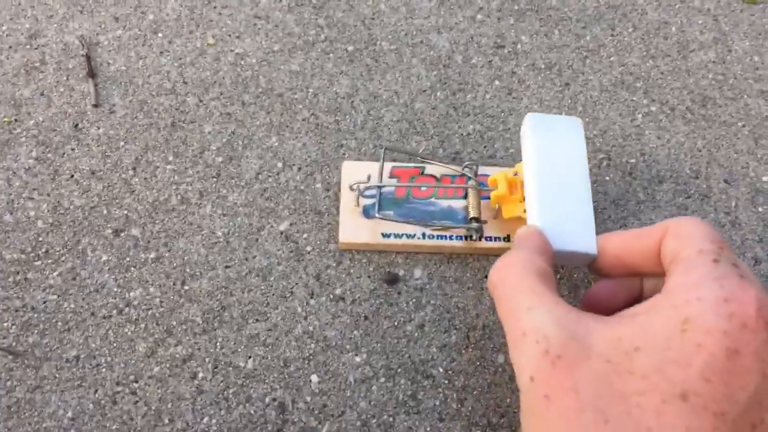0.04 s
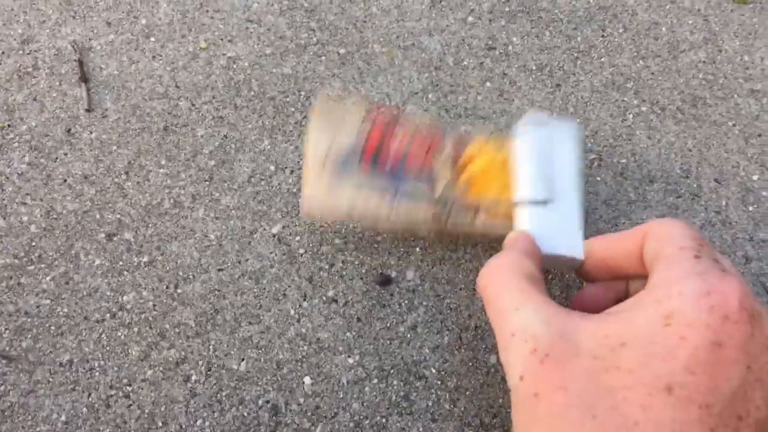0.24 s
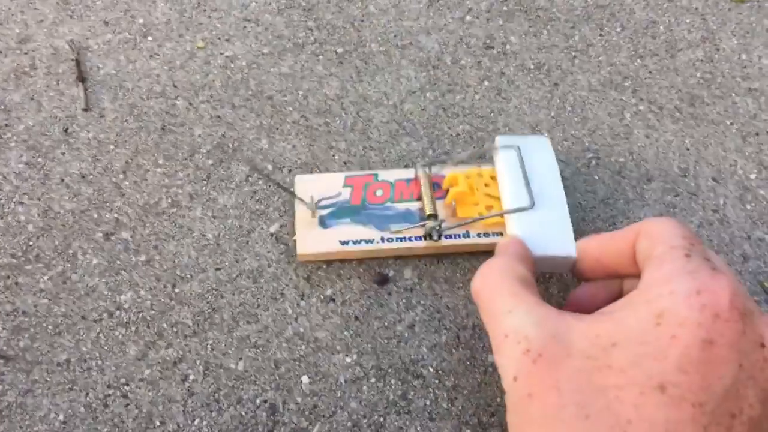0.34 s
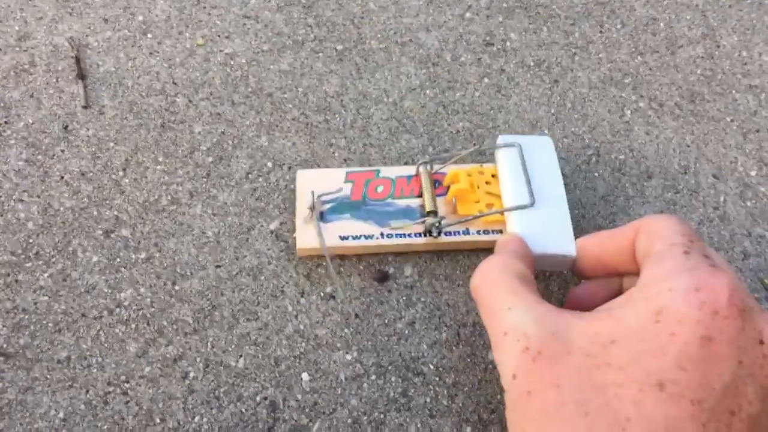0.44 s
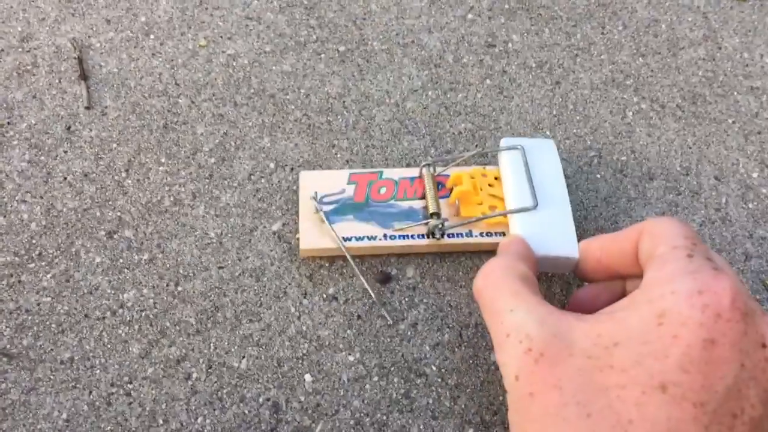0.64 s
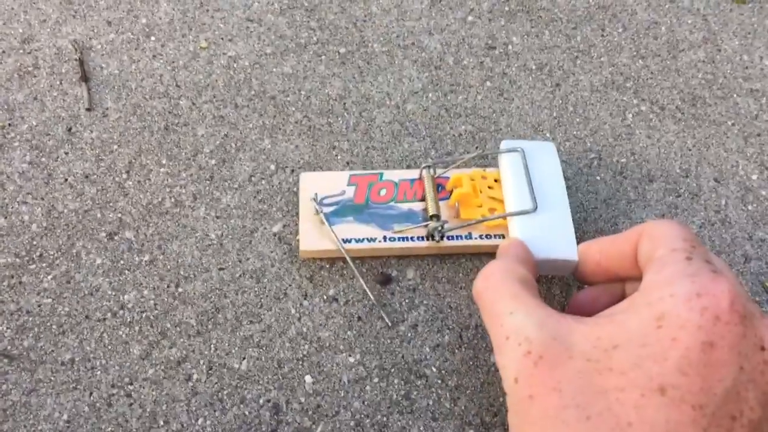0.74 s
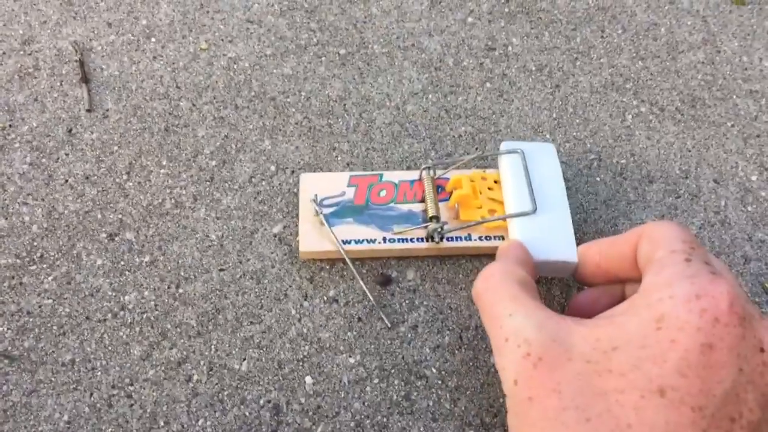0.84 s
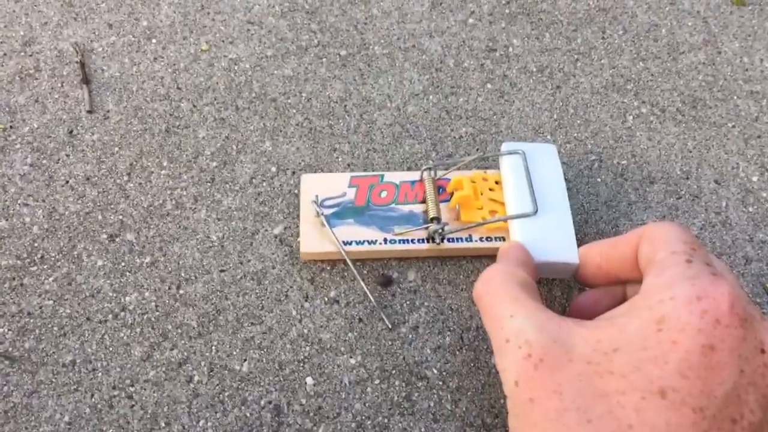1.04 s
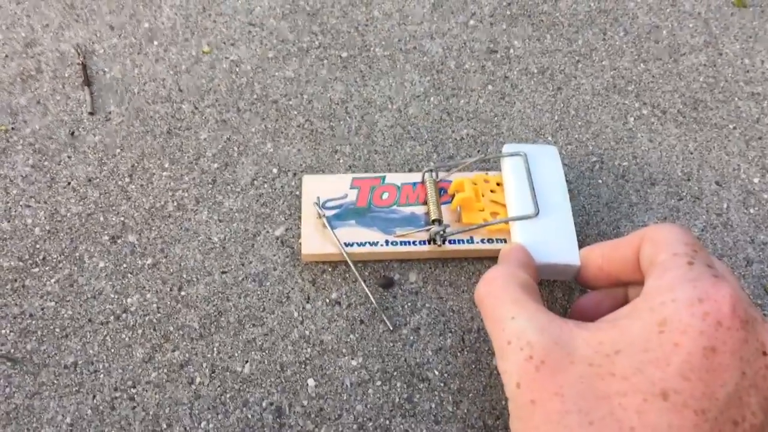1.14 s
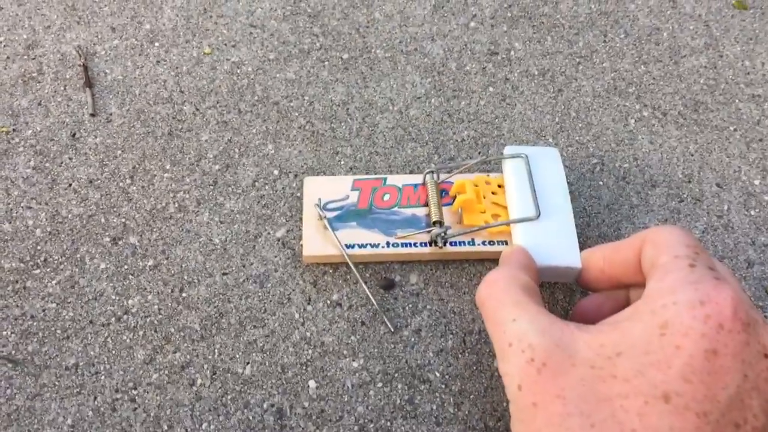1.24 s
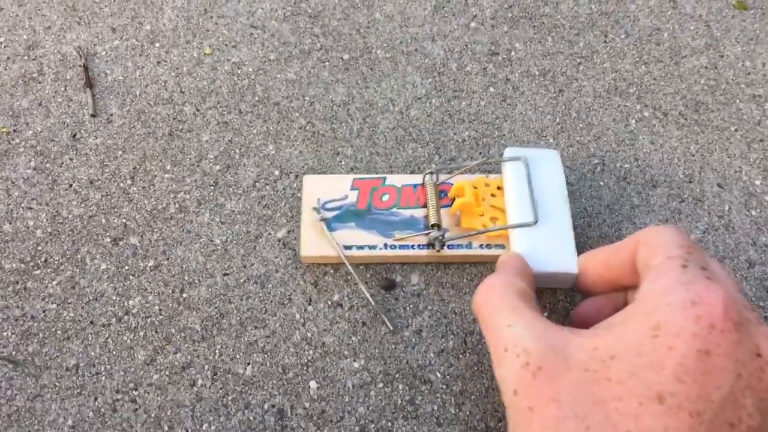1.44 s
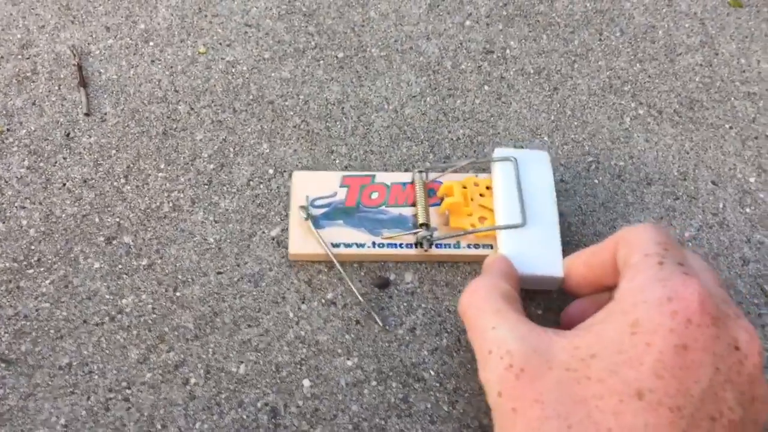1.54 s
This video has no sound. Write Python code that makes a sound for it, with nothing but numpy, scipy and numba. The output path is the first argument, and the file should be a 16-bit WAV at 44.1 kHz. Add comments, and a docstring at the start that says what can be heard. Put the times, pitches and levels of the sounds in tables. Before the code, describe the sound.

A mousetrap snaps shut with a sharp crack, then rattles briefly on pavement.

```python
"""A mousetrap snaps outdoors

A wooden mousetrap snaps on a hand-held plastic block, overloading the microphone and puffing air at it.
The trap jumps, its wires chatter, and it lands on rough pavement and settles. Behind it are distant
traffic, insect hiss and one faint chirp. A gain control turns everything down briefly after the blow."""
import sys
import numpy as np
from scipy import signal
from scipy.fft import rfft, irfft
from scipy.io import wavfile
from scipy.ndimage import minimum_filter1d
from numba import njit

SR = 44100
rng = np.random.default_rng(int(sys.argv[2]) if len(sys.argv) > 2 else 0)


def to_wav(s):
    """Save 16-bit WAV."""
    ch = np.atleast_2d(s).T  # columns
    pcm = np.round(np.clip(ch, -1, 1) * 32767)  # PCM
    wavfile.write(sys.argv[1], SR, pcm.astype(np.int16))


N = 70560
T = np.arange(N) / SR

# The bar's blow, its rebounds, and a short woody knock as the trap first strikes. Each row: start in seconds,
# level in dB, treble boost in dB, # hold in seconds, fade time in seconds. A fade time (t60) is how long a
# sound takes to drop 60 dB.
BLOWS_AND_KNOCK = [(0.2388, 8.5, -1, 0.0048, 0.035), (0.2526, -12, -6, .002, 0.015),
                   (0.2561, -10.5, 11.5, 0.0011, .015), (0.2605, -10, 7.5, .002, 0.015),
                   (0.2753, -5.5, -9, 0.00082, 0.0037)]
# Wires hitting the base and pavement. Each row: start in seconds, wire level in dB,
# strongest pitch in Hz, tick level in dB, wood level in dB.
WIRE_HITS = [(0.2171, -41, 7400, -44, -39.5), (0.232, -35, 7350, -41, -36), (0.2744, -2, 8600, -3, -18),
             (0.2786, -23, 8300, -2.5, -42), (0.282, -11, 8140, -8.5, -21), (0.287, -22, 8700, -17, -42),
             (0.2889, -8, 8500, -15, -34), (0.291, -13, 8650, -8, -34), (0.2961, -10, 8400, -9, -37),
             (0.3013, -14, 8500, -10, -42), (0.3066, -10.5, 8700, -9.5, -30),
             (0.3097, -16, 5740, -25, -25.5), (0.3121, -14.5, 5600, -16, -27), (0.317, -19, 6670, -12, -45),
             (0.3193, -15, 6700, -22, -39), (0.3222, -14, 6400, -27, -47), (0.327, -16, 6200, -16, -43),
             (0.332, -20, 7400, -22, -42), (0.337, -29, 8000, -21, -32), (0.339, -21.5, 7800, -33, -43),
             (0.3493, -27, 6100, -39, -36), (0.3835, -17, 6770, -25, -22), (0.3874, -15, 9000, -15.5, -28),
             (0.3894, -7.5, 8750, -27, -16), (0.3918, -5.5, 8900, -35, -20), (0.3971, -13, 8700, -18, -35),
             (0.4008, -6, 8960, -29, -25.5), (0.4062, -12, 8900, -28, -24), (0.4114, -15, 8550, -33, -32),
             (0.4133, -24, 7800, -26, -34.5), (0.4237, -10, 8800, -18, -33), (0.4378, -25, 6700, -30, -45),
             (0.4476, -25, 6300, -24, -25), (0.452, -16.5, 6730, -30, -29.5),
             (0.4642, -17, 8850, -29, -28.5), (0.47, -19.5, 8740, -26, -35),
             (0.4786, -15.5, 8650, -36, -35), (0.481, -17.5, 8700, -27, -28.5),
             (0.4832, -17, 8700, -38, -28), (0.497, -24.5, 6550, -44, -29), (0.5128, -26, 8850, -41, -39),
             (0.523, -33, 6860, -47, -40.5), (0.5405, -31.5, 8900, -47, -52),
             (0.5671, -10.5, 8660, -35, -20), (0.5725, -20, 8500, -29, -32), (0.5758, -9.5, 6500, -20, -29),
             (0.5791, -10.5, 8950, -26, -19), (0.5874, -17, 8700, -31, -33), (0.591, -25, 8700, -37, -26.5),
             (0.6106, -34, 7850, -49, -35), (0.6154, -47, 6550, -51, -37), (0.62, -26.5, 8400, -46, -32),
             (0.6249, -34, 8600, -49, -43), (0.6297, -22, 6540, -37, -34), (0.7025, -37, 6740, -53, -49.5),
             (0.726, -33.5, 6270, -48, -41), (0.7562, -42, 6700, -59, -50), (1.5376, -55, 6520, -82, -54.5)]
# The base landing on its edge. Each row: start in seconds, level in dB.
BASE_LANDINGS = [(0.3795, -1)]

# Broad resonances that shape a crack. Each row: pitch in Hz, width in Hz, relative level in dB.
TRAP_PEAKS = [(480, 480, -14.5), (1020, 300, -16), (2160, 200, -10), (2480, 250, -14), (3340, 254, -4),
              (3776, 350, -3.5), (5110, 250, -11), (6100, 300, -5.5), (7317, 320, -3), (8700, 220, -3.5),
              (9980, 600, -10), (11380, 470, -5.5), (12600, 440, -12), (13860, 570, -18)]  # the whole trap under the blow
EDGE_PEAKS = [(250, 300, -28), (890, 420, -16), (3250, 320, 4.5), (4100, 370, -9), (6580, 210, 1.5),
              (7260, 400, -7), (7800, 640, -4), (11660, 430, -8.5)]  # the base as it lands

# Modes, the tones a struck part rings with.
# Each row: pitch in Hz, relative level in dB, fade time in seconds.
BASE_BLOW_MODES = [(3366, 0, .022), (3650, -6, .02)]  # the base under the blow
BASE_EDGE_MODES = [(190, -29, .035), (1350, -20, .045), (2880, -10, .016), (3170, -2, .016), (3320, 2, .02),
                   (3680, -5, .018)]  # the base struck on its edge
BASE_TAP_MODES = [(1416, -21, 0.078), (2304, -14.5, 0.017), (2900, -7.5, 0.02), (3507, 1.5, 0.031),
                  (3900, -5, 0.0301), (4260, -4, .025)]  # the base tapped by a wire
WIRE_MODES = [(5215, -8.5, 0.048), (6030, -8, 0.069), (6450, 3, .05), (6930, -6, .075), (7465, -6.5, .055),
              (7850, -6, .07), (8870, -6, .055), (8920, -2, .035), (8940, -4, .03)]  # the steel wires
SPRING_MODES = [(6016, -25, .14), (6904, -20, .2), (7320, -24, .15), (7962, -26, .35), (8580, -16, .17),
                (8701, -12, .18), (11291, -21, .13), (11433, -21, .12), (11565, -17, .13),
                (11779, -20, .13), (11843, -18, .13), (12912, -20, .26), (13458, -26, .3),
                (14845, -28, .28)]  # the spring's fine ring
FRAME_MODES = [(1412, -22, .19), (1750, -26, .13), (3510, -28, .11), (4258, -27, .22)]  # the wire frame's slow, low ring

# Noise colours, from bass to treble. Each row: frequency in Hz, relative level in dB.
SCRAPE_COLOUR = [(1200, -37.5), (2000, -26), (4600, -14.5), (6200, 5), (9200, 3.5), (10300, -21),
                 (16000, -21)]  # scraping steel
TICK_COLOUR = [(6000, -27.5), (9500, -9.5), (10700, -10), (11700, 4), (12600, -4.5), (14000, -6.5),
               (15400, -6.5), (16500, -13)]  # a sharp tick
KNOCK_COLOUR = [(150, -18.5), (500, -21), (1100, -21.5), (2000, -12.5), (2600, -8), (3300, -2), (4300, 2),
                (6000, -13.5)]  # a knock on wood
TRAFFIC_COLOUR = [(15, -47.5), (25, -24.5), (41, -13.5), (64, -0.5), (153, -3), (249, -10.5), (354, -26.5),
                  (624, -32.5), (754, -33.5), (1230, -28.5), (1650, -32), (3080, -41), (3520, -40),
                  (5000, -37.5), (6740, -22.5), (8590, -48.5), (16000, -72.5)]  # distant traffic and outdoor air

SCRAPE_T60_S, CONTACT_HOLD_S = .0072, .00073
LONG_RING = 22000  # samples, about half a second


def snap():
    """The bar whips round, slams on the block so that the whole trap rings, and rebounds; then a short woody
    knock sounds as the trap first strikes."""
    blow_s, rise_s = BLOWS_AND_KNOCK[0][0], .0021
    swish = noise(lambda f: slopes(TICK_COLOUR)(f) + humps(TRAP_PEAKS)(f) / 2, N)
    out = undb(-7.5) * swish * np.exp(-np.abs(T - blow_s) / rise_s) * (T < blow_s)
    add(out, blow_s, struck(ring(BASE_BLOW_MODES), db=6))
    add(out, blow_s, spring_and_frame(spring_db=-6, frame_db=-2))
    for start, db, treble_db, hold, t60 in BLOWS_AND_KNOCK:
        treble = lambda f: undb(treble_db * np.clip(np.log2(f / 3500) / 2, 0, 1))
        crack = burst(lambda f: humps(TRAP_PEAKS)(f) * treble(f), t60, hold)
        add(out, start, struck(crack, db))
    return out


def spring_and_frame(spring_db, frame_db):
    """The spring and the wire frame ring on after a hit."""
    spring = undb(spring_db) * ring(SPRING_MODES, size=LONG_RING)
    return spring + undb(frame_db) * ring(FRAME_MODES, size=LONG_RING)


def air_puff():
    """The jumping trap pushes air at the microphone: a thump that sinks in pitch."""
    start_s, rise_s, decay_s = .2413, .0034, .011
    start_hz, end_hz, sink_s = 164, 42, .007
    t = np.maximum(T - start_s, 0)
    hz = end_hz + (start_hz - end_hz) * np.exp(-t / sink_s)
    envelope = np.minimum(t / rise_s, 1) * np.exp(-t / decay_s)
    return -undb(11.5) * np.sin(2 * np.pi * np.cumsum(hz) / SR) * envelope


def landing():
    """The base knocks on the pavement: a woody ring under a gritty crack."""
    out = np.zeros(N)
    for start, db in BASE_LANDINGS:
        crack = burst(humps(EDGE_PEAKS), t60=.018, hold=.0012)
        add(out, start, struck(ring(BASE_EDGE_MODES), db) + struck(crack, db + 1))
    return out


def wire_chatter():
    """Each hit rings the wires, knocks the wood, ticks and keeps the spring's coils shimmering."""
    focus_db, focus_width_hz = 13.5, 430
    coil_db, coil_t60_s = -29, .135
    out = np.zeros(N)
    for start, wire_db, ring_hz, tick_db, wood_db in WIRE_HITS:
        focus = lambda f: undb(focus_db * np.exp(-((f - ring_hz) / focus_width_hz) ** 2))
        steel = lambda f: slopes(SCRAPE_COLOUR)(f) * focus(f)
        wire = burst(steel, SCRAPE_T60_S, CONTACT_HOLD_S)
        # Where a wire is touched shifts its pitch a little.
        wire += struck(ring(WIRE_MODES, focus, detune=.004), -9) / 2
        wood = burst(slopes(KNOCK_COLOUR), t60=.008, hold=CONTACT_HOLD_S)
        wood += struck(ring(BASE_TAP_MODES), 3.5) / 2
        tick = burst(slopes(TICK_COLOUR), t60=.014, hold=CONTACT_HOLD_S)
        add(out, start, struck(wire, wire_db) + struck(wood, wood_db) + struck(tick, tick_db))
        shimmer = undb(wire_db) * burst(steel, coil_t60_s)
        shimmer += undb(tick_db) * burst(slopes(TICK_COLOUR), coil_t60_s)
        add(out, start, undb(coil_db) * shimmer)
        rebound_s = start + .0035 * (.5 + rng.random())  # the wire touches again, more softly
        add(out, rebound_s, struck(burst(steel, SCRAPE_T60_S), wire_db - 12.5))
        add(out, start, spring_and_frame(spring_db=(wire_db + tick_db) / 2 - 8, frame_db=wood_db))
    return out


def grit_slide():
    """A wire drags over grit as the trap settles; tiny catches ring the wire and the wood."""
    peak_s, spread_s, catches_per_s = .605, .05, 400
    catches = (rng.random(N) < catches_per_s / SR) * rng.standard_normal(N)
    one_catch = unit(burst(slopes(SCRAPE_COLOUR), SCRAPE_T60_S)) + unit(ring(BASE_TAP_MODES)) / 2
    scrape = unit(signal.fftconvolve(catches, one_catch)[:N])
    return undb(-34.5) * scrape * np.exp(-((T - peak_s) / spread_s) ** 2)


def echo(x):
    """The ground and distant walls scatter a little of the sound back."""
    colour = slopes([(100, -13.5), (1000, -2), (4000, -1.5), (15000, -11)])
    tail = burst(colour, t60=.35, size=LONG_RING)
    return undb(-28) * signal.fftconvolve(x, tail / np.linalg.norm(tail))[:N]


def traffic_and_insects():
    """Distant traffic rumbles under a high, fluttering band of insect hiss."""
    insect_hz, flutter_db = 6840, 2.5
    flutter = noise(lambda f: 1 / (1 + (f / 25) ** 4), N)
    insects = noise(lambda f: humps([(insect_hz, 640, 0)])(f) ** 2, N)
    traffic = noise(slopes(TRAFFIC_COLOUR), N)
    return undb(-44) * traffic + undb(-58 + flutter_db * flutter) * insects


def bird():
    """One distant falling whistle, blurred as if by echoes."""
    peak_s, spread_s, pitch_hz, fall_hz_per_s = 1.315, .053, 3560, 2000
    t = T - peak_s
    blur = noise(lambda f: 1 / (1 + (f / 90) ** 2), N)
    whistle = np.sin(2 * np.pi * (pitch_hz - fall_hz_per_s * t / 2) * t)
    return undb(-58.5) * blur * whistle * np.exp(-np.abs(t) / spread_s)


def undb(db):
    """Turn decibels into a gain."""
    return 10 ** (np.asarray(db) / 20)


def unit(x):
    """Scale to an average (rms) level of 1."""
    return x / np.sqrt(np.mean(x ** 2))


def noise(colour, size):
    """Noise of level 1, shaped by colour, a function from Hz to gain."""
    hz = np.fft.rfftfreq(size, 1 / SR) + 1
    return unit(irfft(rfft(rng.standard_normal(size)) * colour(hz), size))


def slopes(points):
    """A colour that joins (Hz, dB) points."""
    hz, db = np.array(points).T
    return lambda f: undb(np.interp(np.log(f), np.log(hz), db))


def humps(peaks):
    """A colour made of broad resonances."""
    return lambda f: np.sqrt(sum(undb(db) ** 2 / (1 + ((f * f - hz * hz) / (f * width)) ** 2)
                                 for hz, width, db in peaks))


def fade(t, t60, hold=0, attack_s=.00024):
    """The loudness of a hit: rise quickly, hold, then die away."""
    return np.minimum(t / attack_s, 1) * np.exp(-np.log(1000) * np.maximum(t - hold, 0) / t60)


def burst(colour, t60, hold=0, size=8192):
    """A burst of coloured noise that dies away."""
    return noise(colour, size) * fade(T[:size], t60, hold)


def ring(modes, weight=np.ones_like, size=8192, detune=0, scatter_db=2):
    """Fading tones, set ringing a little differently by every hit."""
    hz, db, t60 = np.array(modes).T[:, :, None]
    hz = hz * (1 + detune * rng.standard_normal(hz.shape))
    gain = undb(db + scatter_db * rng.standard_normal(hz.shape)) * weight(hz)
    tones = np.sin(2 * np.pi * (hz * T[:size] + rng.random(hz.shape)))
    return np.sum(gain * tones * fade(T[:size], t60), axis=0)


def struck(x, db, size=150):
    """Scale a hit so that its first few milliseconds have the given level."""
    return x * undb(db) / np.sqrt(np.mean(x[:size] ** 2))


def add(out, start_s, x):
    """Mix x into out at the given time."""
    i = int(start_s * SR)
    out[i:i + len(x)] += x[:max(N - i, 0)]


@njit
def follow(x, rise, fall):
    """Follow x smoothly, with separate rates for going up and down."""
    y, level = np.empty(len(x)), 0.
    for i in range(len(x)):
        level += (x[i] - level) * (rise if x[i] > level else fall)
        y[i] = level
    return y


def scene():
    """The trap, its faint echo and the outdoor background, in one channel."""
    trap = snap() + landing() + wire_chatter() + grit_slide()
    return (trap + echo(trap) + air_puff() + traffic_and_insects() + bird())[None]


def record(dry):
    """Loud peaks turn the gain down for a moment; overload is rounded off and the highest treble cut."""
    threshold_db, max_cut_db, ceiling, top_hz = 3, 13, .68, 15750
    attack_s, hold_s, release_s = .0025, .23, .045
    over_db = np.clip(20 * np.log10(np.abs(dry[0]) + 1e-9) - threshold_db, 0, max_cut_db)
    span = int(hold_s * SR)
    held_db = -minimum_filter1d(-over_db, span, origin=(span - 1) // 2, mode="constant")
    cut_db = follow(held_db, 1 / (attack_s * SR), 1 / (release_s * SR))
    rounded = ceiling * np.tanh(dry * undb(-cut_db) / ceiling)
    return signal.sosfilt(signal.ellip(8, .2, 70, top_hz, fs=SR, output="sos"), rounded)


dry = scene()
out = record(dry)
to_wav(out)
```